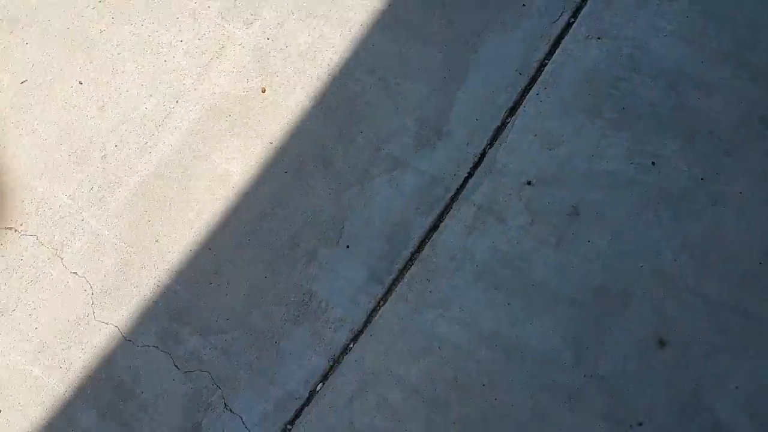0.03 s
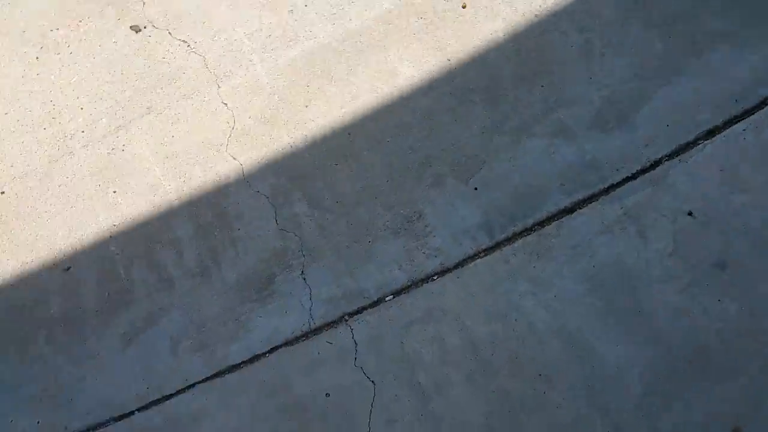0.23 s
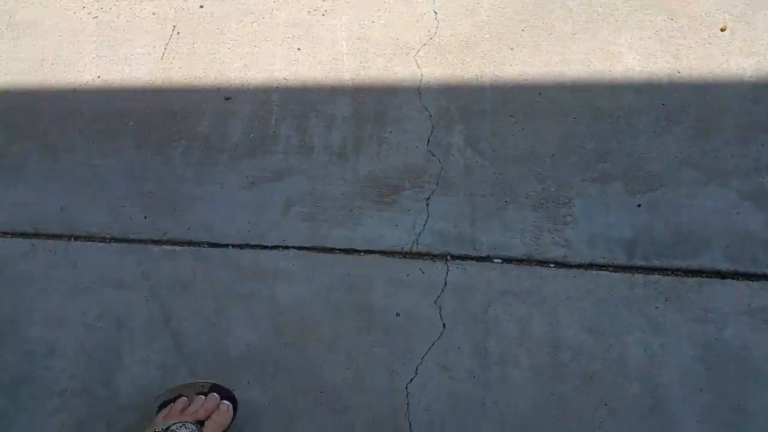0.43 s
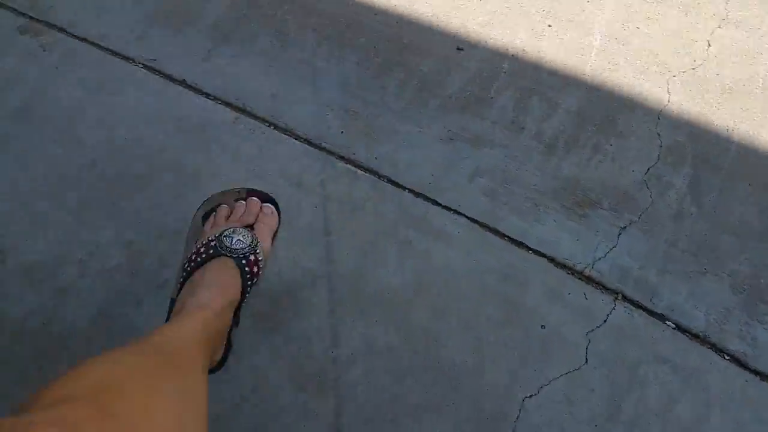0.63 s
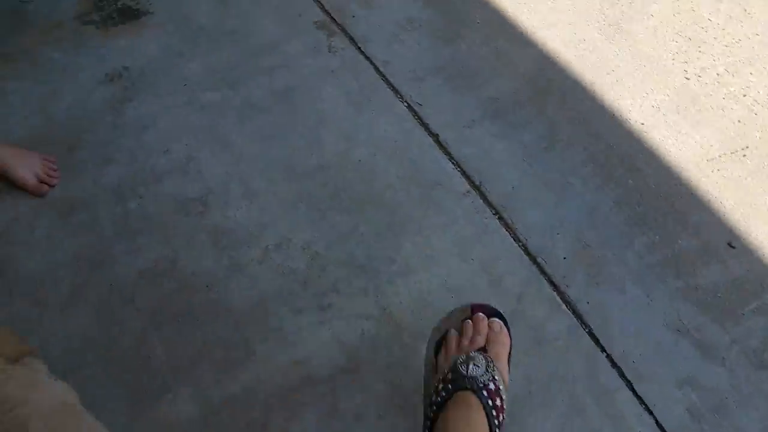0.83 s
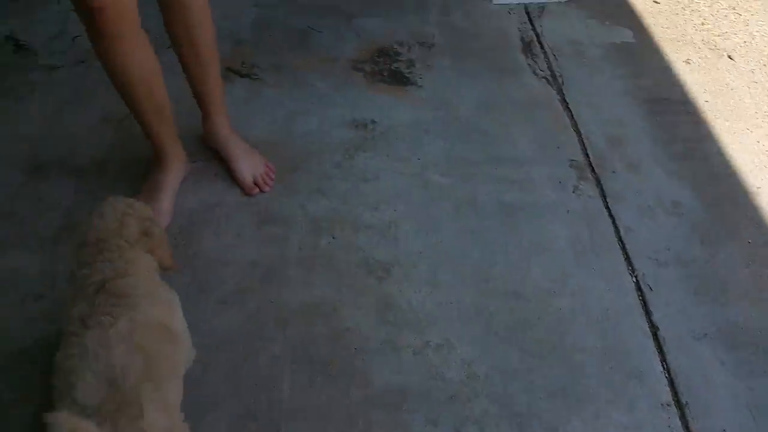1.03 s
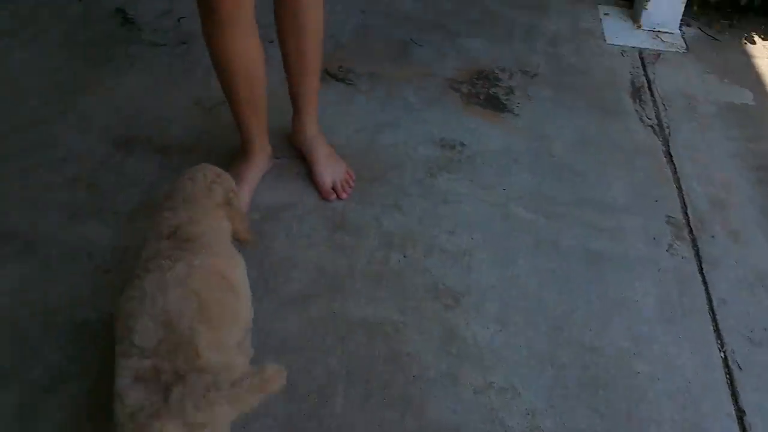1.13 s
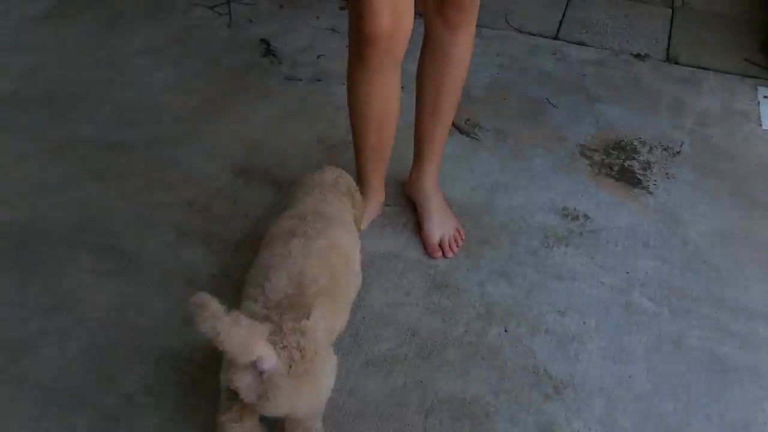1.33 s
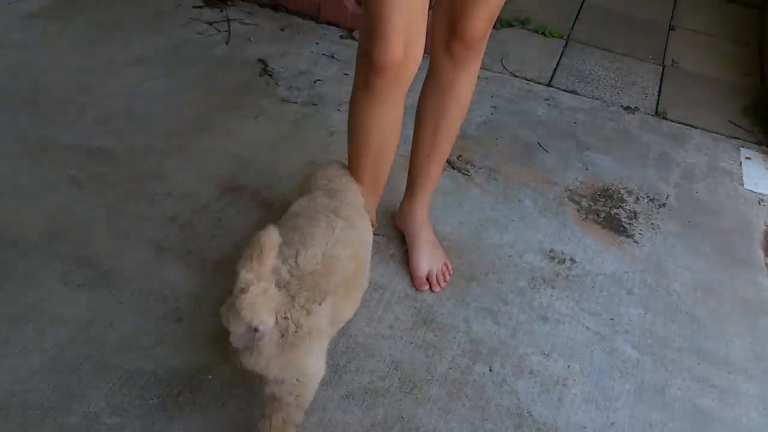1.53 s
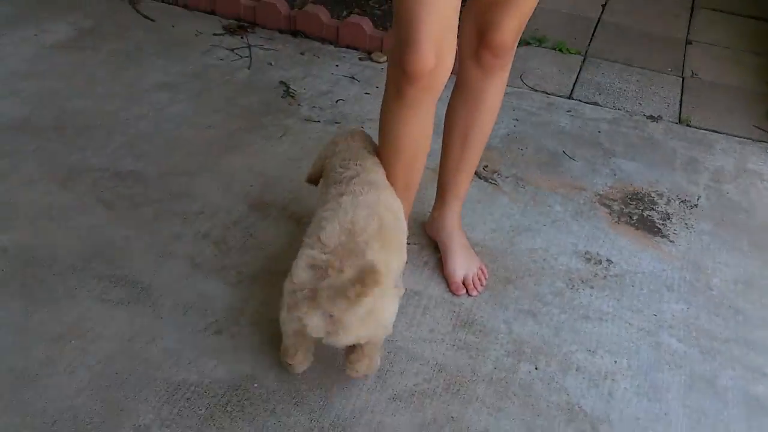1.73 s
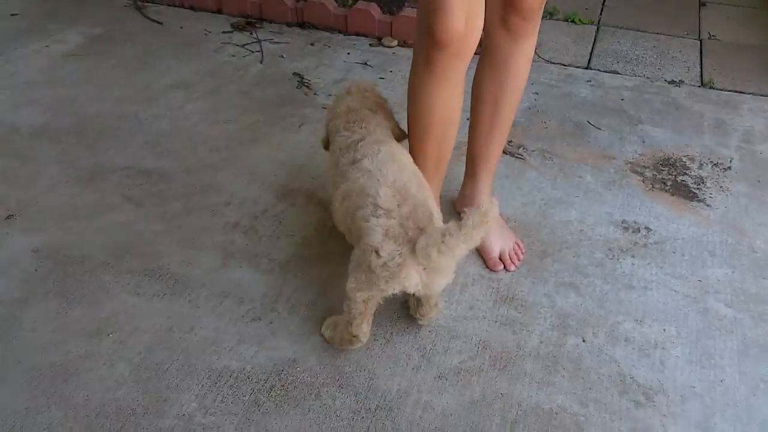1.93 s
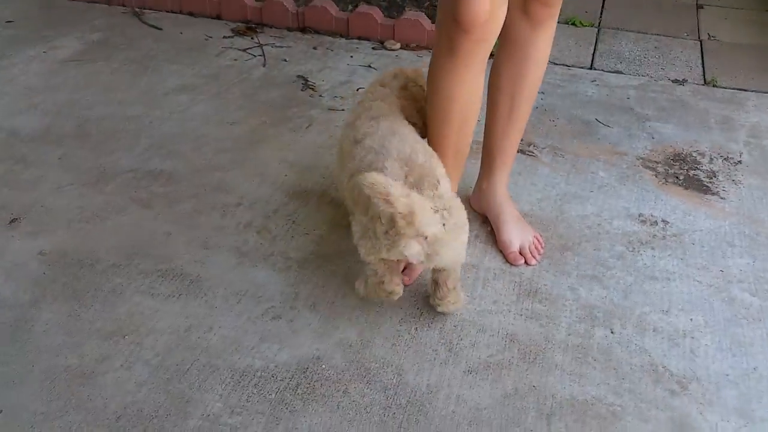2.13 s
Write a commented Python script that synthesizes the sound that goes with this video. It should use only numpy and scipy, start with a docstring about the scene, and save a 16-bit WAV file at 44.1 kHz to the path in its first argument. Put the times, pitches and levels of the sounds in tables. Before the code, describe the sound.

A puppy's claws tick on a concrete patio over low traffic rumble and faint machine drones. Light scuffs and small clicks come in the first half second, while an engine hum fades by 0.8 seconds. A distant dog barks once around 0.9. From 1.1 to 1.4 come sharp close clicks on the right, gritty scuffs and two soft bumps. More claw ticks and scrapes follow from 1.6 to 1.8.

```python
"""A puppy walks about on a concrete patio: its claws tick by impact, and its paws and a sandal
scuff the grit by friction, a dense train of tiny slips. A few sharp dry clicks (impulses with broad
resonances) and two soft bumps come from very near the right microphone. Far off a dog barks once,
its vocal folds and hoarse breath heard by reflection from walls. Under it all lie neighbourhood
rumble, machine drones and an engine hum that fades and faintly returns."""
import sys
import numpy as np
from scipy import signal
from scipy.fft import rfft, irfft, next_fast_len
from scipy.io import wavfile
from scipy.ndimage import uniform_filter1d

SR = 44100
rng = np.random.default_rng(int(sys.argv[2]) if len(sys.argv) > 2 else 0)


def to_wav(s):
    """Save 16-bit WAV."""
    ch = np.atleast_2d(s).T  # columns
    pcm = np.round(np.clip(ch, -1, 1) * 32767)  # PCM
    wavfile.write(sys.argv[1], SR, pcm.astype(np.int16))


N = 96314
PADDED = next_fast_len(N, True)
T, HZ = np.arange(N) / SR, np.fft.rfftfreq(PADDED, 1 / SR)

# Traffic spectra, early and late (frequency [Hz], relative density [dB])
TRAFFIC_EARLY = [(15, -36), (25, -11), (97, -5), (137, -5), (166, -7.5), (285, -9.5), (591, -17.5),
                 (887, -17), (1400, -26), (2110, -21.5), (3430, -32.5), (3820, -34.5), (5730, -37),
                 (7920, -46), (16000, -50.5)]
TRAFFIC_LATE = [(15, -48), (25, -20), (76, -8), (114, -3.5), (141, -9), (293, -14), (384, -23), (427, -17),
                (516, -19), (887, -20), (1840, -24.5), (2000, -26.5), (4250, -35), (5140, -35),
                (16000, -53.5)]
# Course of the traffic (time [s], level [dB], share of the late spectrum [0-1])
TRAFFIC_COURSE = [(0, -43.5, 0.21), (.35, -44.5, 0.036), (.55, -45.5, .1), (.72, -44.5, 0),
                  (1.1, -44.5, 0.23), (1.38, -46.5, 1), (1.53, -49.5, 0.66), (1.9, -50, 0.88),
                  (2.18, -51.5, 0.89)]
# Likeness of its two channels (frequency [Hz], correlation [negatives count as 0])
TRAFFIC_COHERENCE = [(60, 0.78), (150, 0.92), (380, 0.83), (950, 0.24), (2380, -0.25), (5980, -0.51),
                     (15000, -1.3)]
# Its balance (frequency [Hz], left minus right [dB])
TRAFFIC_PAN = [(60, -0.5), (150, -2.5), (380, 1), (950, -1), (2380, 0.5), (5980, -8), (15000, 3.5)]
# Machine drones (frequency [Hz], bandwidth [Hz], level [dB])
MACHINE_DRONES = [(117.7, 4, -60.5), (291.8, 6.7, -64), (1688, 180, -68)]
# Engine hum (time [s], level [dB])
ENGINE_LEVEL = [(0, -46), (.26, -45.5), (.5, -46.5), (.7, -53.5), (.9, -86), (2.18, -55)]
# Strokes of paw or sole (peak time [s], rise [s], fall [s], rasp [dB], grit [dB], left minus right [dB])
SCUFF_STROKES = [(.188, 0.01, .01, -54, -47.5, -10), (0.456, 0.047, 0.029, -59, -50, -7),
                 (.53, 0.017, 0.039, -75, -57, 5), (1.148, 0.047, 0.024, -47.5, -53.5, -10.5),
                 (1.198, 0.0017, 0.019, -36, -45.5, 2), (1.226, 0.014, 0.02, -56, -47.5, -10),
                 (1.268, 0.014, 0.038, -51, -55.5, -13), (1.345, 0.041, 0.15, -52.5, -60, 0),
                 (1.607, 0.0065, 0.015, -55, -73, -11), (1.640, 0.012, 0.0097, -40, -48, -2.5),
                 (1.662, .008, 0.056, -50, -56, -3), (1.778, 0.012, 0.016, -39, -51.5, 4),
                 (1.823, 0.017, 0.024, -47.5, -51, -1.5)]
# Friction spectra (frequency [Hz], relative level [dB])
RASP_SPECTRUM = [(300, -22), (1000, -12), (1800, -8.5), (2450, 0), (3300, -12.5), (4400, -11.5),
                 (5400, -52), (9000, -35), (16000, -34)]
GRIT_SPECTRUM = [(500, -14), (3000, 1.5), (4500, -1), (6000, 2.5), (7400, 0), (8700, -17.5), (12000, -15),
                 (16000, -21.5)]
SKID_SPECTRUM = [(2000, -24), (5000, -2), (8000, 3), (12500, -1), (16000, -5)]
# Close clicks (time [s], thud [dB], knock [dB], knock frequency [Hz], crack [dB], edge [dB],
# left gain [dB], left tilt [dB/octave])
CLOSE_CLICKS = [(0.266, -25, -13, 5300, -18.5, -45, -19, 3), (1.086, -29, -4.5, 2430, -21, -39, -29, -3),
                (1.2047, 1.5, 19, 1340, 16, -0.5, 10.5, 0.5), (1.2781, -6, 4, 1400, 4, -16, -5, 5),
                (1.3280, 12.5, 10, 1240, -10.5, -21.5, -6.5, -7),
                (1.7341, -2, 8.5, 1040, -1, -29, -3.5, -0.5)]
# A click at the left microphone, before gain and tilt (frequency [Hz], level [dB])
LEFT_CLICK_SPECTRUM = [(200, -21), (500, -17.5), (1000, 2.5), (1500, -5.5), (2300, -2), (3000, -3),
                       (4000, -8), (4800, -29), (6000, -21), (8000, -34), (15000, -40)]
# Claw impacts (time [s], ring [dB], ring frequency [Hz], snap [dB], left minus right [dB])
CLAW_IMPACTS = [(0.516, -23, 6500, -14, 23), (1.193, 3, 2620, -15, -5), (1.2748, -8, 2540, -18.5, 9),
                (1.6366, 2.5, 2340, -25, 38), (1.6421, -0.5, 2580, -23, 5), (1.7713, 2.5, 2110, -33, 17),
                (1.7768, 4.5, 2330, -17.5, -2.5), (1.7827, 2.5, 2620, -32, 10),
                (1.7878, -1.5, 1980, -18, 14), (1.8283, -11, 6100, -12, 22)]
# A claw's gritty snap (frequency [Hz], gain [dB])
SNAP_SPECTRUM = [(500, -1), (1300, -3), (2500, 2.5), (4000, -14.5), (6300, 4), (8500, -16), (11000, -24.5),
                 (16000, -12)]
# Vocal tract filters for the voiced and hoarse parts of the bark (frequency [Hz], relative gain [dB])
VOICED_FORMANTS = [(450, -1.5), (900, -1), (1360, -0.5), (1820, -6.5), (2280, -26), (2750, -21),
                   (4000, -45)]
HOARSE_FORMANTS = [(150, -49), (330, -10), (430, -2), (570, 0), (740, -4.5), (880, -2.5), (1080, -0.5),
                   (1330, -2.5), (1550, -15), (1750, -6), (2100, -9), (2500, -16), (3200, -39), (4500, -44),
                   (6300, -29), (9000, -62)]
# Soft bumps (time [s], frequency [Hz], half-width [s], envelope peak [dB], left minus right [dB])
SOFT_BUMPS = [(1.162, 103, 0.0062, -31, -8.5), (1.3305, 165, 0.0067, -34, -21)]


def amp(db):
    """Decibels to amplitude ratio."""
    return 10 ** (np.asarray(db) / 20)


def unit(x):
    """Normalisation to rms 1."""
    return x / np.sqrt(np.mean(x ** 2) + 1e-20)


def read(points, hz=HZ):
    """Interpolation of a spectrum on a log-frequency axis."""
    f, value = np.transpose(points)
    return np.interp(np.log(hz + 1), np.log(f + 1), value)


def pan(db):
    """Constant-power left and right gains for a level difference."""
    return unit(amp([[db / 2], [-db / 2]]))


def colour(x, points):
    """Linear filtering by a spectrum table, at rms 1."""
    return unit(irfft(rfft(x, PADDED) * amp(read(points)), PADDED)[..., :N])


def pulse(gain):
    """Minimum phase: the most compact causal pulse with this spectrum."""
    log_gain = np.log(np.maximum(np.r_[gain, gain[-2:0:-1]], 1e-5))
    return np.fft.ifft(np.exp(np.conj(signal.hilbert(log_gain)))).real


def add(mix, start_s, sound):
    """Superposition of a sound from a given time."""
    part = mix[..., round(start_s * SR):][..., :sound.shape[-1]]
    part += sound[..., :part.shape[-1]]


def traffic():
    """Diffuse noise, coherent only at low frequencies, that dulls as the microphone turns."""
    left, independent = rfft(rng.standard_normal((2, PADDED)))
    coherence = np.clip(read(TRAFFIC_COHERENCE), 0, 1)
    right = coherence * left + np.sqrt(1 - coherence ** 2) * independent
    balance = amp(np.outer([.5, -.5], read(TRAFFIC_PAN)))
    noise = irfft(np.array([left, right]) * balance, PADDED)
    times, db, share = np.transpose(TRAFFIC_COURSE)
    late = np.interp(T, times, share)
    rumble = (1 - late) * colour(noise, TRAFFIC_EARLY) + late * colour(noise, TRAFFIC_LATE)
    return amp(np.interp(T, times, db)) * rumble


def machine_drones():
    """Narrow-band noise: each steady drone is heard as a pitch at its band's centre."""
    out = np.zeros(N)
    for hz, width, db in MACHINE_DRONES:
        band = rfft(rng.standard_normal(PADDED)) / (1 + (2 * (HZ - hz) / width) ** 2)
        out += amp(db) * unit(irfft(band, PADDED)[:N])
    return out


def engine_hum(hz=140, waver=0.016):
    """Frequency modulation: an engine's tone wavers with its speed."""
    drift = unit(uniform_filter1d(rng.standard_normal(N), size=3000))
    cycles = np.cumsum(hz * (1 + waver * drift)) / SR
    return amp(np.interp(T, *np.transpose(ENGINE_LEVEL))) * unit(np.sin(2 * np.pi * cycles))


def friction(spectrum, slips_per_s=4000, spread_db=4.5):
    """Shot noise: tiny slips over sand grains give random impulses of uneven size."""
    size = amp(spread_db * np.minimum(rng.exponential(1, (2, N)), 4))
    slips = size * rng.choice([-1, 1], (2, N)) * (rng.random((2, N)) < slips_per_s / SR)
    return colour(slips, spectrum)


def swell(peak_s, rise_s, fall_s):
    """Exponential growth to a peak and decay from it."""
    return np.exp(-np.minimum(np.maximum((peak_s - T) / rise_s, (T - peak_s) / fall_s), 20))


def scuffs():
    """Sliding friction: paws and a sole drag over concrete with a rasp and a gritty hiss."""
    rasp, grit = friction(RASP_SPECTRUM), friction(GRIT_SPECTRUM)
    return sum(pan(side) * swell(peak_s, rise, fall) * (amp(rasp_db) * rasp + amp(grit_db) * grit)
               for peak_s, rise, fall, rasp_db, grit_db, side in SCUFF_STROKES)


def close_clicks(size=1024, thud_hz=260, thud_width_hz=2230, dispersion=0.55, left_delay_s=.00042):
    """Impulse response: hard contacts excite broad resonances, heard later and duller on the left."""
    out, hz = np.zeros((2, N)), np.fft.rfftfreq(size, 1 / SR)

    def resonance(centre_hz, octaves):
        """A broad peak, symmetric in log frequency."""
        return (1 + (np.log2((hz + 1) / centre_hz) / octaves) ** 2 / 4) ** -4

    thud = hz / np.hypot(hz, thud_hz / 2) / (1 + ((hz - thud_hz) / thud_width_hz) ** 2) ** 2
    crack = resonance(2400, 0.48) + resonance(3826, 0.23)
    edge = resonance(9100, 0.87)
    tilt_octaves = np.log2(np.maximum(hz, 300) / 2000)
    for start_s, thud_db, knock_db, knock_hz, crack_db, edge_db, left_db, tilt in CLOSE_CLICKS:
        knock = resonance(knock_hz, 0.4)
        bands = [amp(thud_db) * thud, amp(knock_db) * knock, amp(crack_db) * crack, amp(edge_db) * edge]
        right = pulse(np.linalg.norm(bands, axis=0))  # the bands add in power
        right = signal.lfilter([-dispersion, 1], [1, -dispersion], right)  # all-pass: treble leads
        left = pulse(amp(left_db + read(LEFT_CLICK_SPECTRUM, hz) + tilt * tilt_octaves))
        add(out[1], start_s, right)
        add(out[0], start_s + left_delay_s, left)
    return out


def claw_ticks(size=1024, ring_t60_s=0.0071, snap_s=0.0015):
    """Damped free vibration: a claw strikes concrete with a gritty snap and rings briefly."""
    out, t, hz = np.zeros((2, N)), T[:size], np.fft.rfftfreq(size, 1 / SR)
    snap_pulse = pulse(amp(read(SNAP_SPECTRUM, hz)))
    envelope = amp(-60 * t / ring_t60_s) * (1 - np.exp(-t / snap_s))
    for start_s, ring_db, ring_hz, snap_db, side in CLAW_IMPACTS:
        crush = rng.standard_normal((2, size)) * np.exp(-t / snap_s)
        crush /= np.linalg.norm(crush, axis=1, keepdims=True)
        snap = signal.fftconvolve(crush, snap_pulse[None])[:, :size]
        ring = np.sin(2 * np.pi * ring_hz * t) * envelope * 2 / envelope.sum()
        add(out, start_s, pan(side) * (amp(ring_db) * ring + amp(snap_db) * snap))
    return out


def bark(start_s=.84, length_s=.16, rise_s=0.024, fall_s=0.031, top_hz=454.7, hoarseness=0.51):
    """Source and filter: the vocal tract shapes fold harmonics and breath pulsed at the same pitch."""
    age = T - start_s
    arch = np.sin(np.pi * np.clip(age / length_s, 0, 1))
    jitter = .6 * uniform_filter1d(rng.standard_normal(N), size=120)
    cycles = np.cumsum(top_hz * (1 - .12 * (1 - arch)) * (1 + jitter)) / SR
    folds = unit(sum(np.cos(2 * np.pi * k * cycles) for k in range(1, 9)))
    puffs = (0.49 + np.exp(-(cycles % 1) / 0.28)) * rng.standard_normal(N)
    closing = (length_s - age) / fall_s
    gate = lambda delay_s: np.clip(np.minimum((age - delay_s) / rise_s, closing), 0, 1)
    hoarse = gate(delay_s=0) * colour(puffs, HOARSE_FORMANTS)
    voiced = gate(delay_s=0.021) * colour(folds, VOICED_FORMANTS)
    return (1 - hoarseness) * voiced + hoarseness * hoarse


def wall_reflections(sound, gain_db=-29.5, t60_s=0.61, echo_s=.2, echo_db=-12.5):
    """Reverberation: a far sound arrives only as early reflections, a decaying tail and a late echo."""
    t = T[:SR]
    reflections = rng.standard_normal((2, SR)) + 0.72 * rng.standard_normal(SR)  # partly coherent
    early = 1.7 * np.exp(-t / 0.0075)
    tail = amp(-60 * t / t60_s)
    echo = amp(echo_db - 60 * abs(t - echo_s) / t60_s) * (t > echo_s)
    response = reflections * (early + tail + echo)
    return amp(gain_db) * signal.fftconvolve(sound[None], response / np.linalg.norm(response[0]))[:, :N]


def soft_bumps():
    """Gaussian wave packets: low pushes of pressure about one cycle long."""
    return sum(pan(side) * amp(db) * np.exp(-((T - s) / width) ** 2) * np.sin(2 * np.pi * hz * (T - s))
               for s, hz, width, db, side in SOFT_BUMPS)


def claw_skid(level_db=-52.5):
    """Sliding friction: a claw slips with a brief, thin hiss."""
    envelope = swell(peak_s=1.8075, rise_s=.01, fall_s=0.0036)
    return pan(7) * amp(level_db) * envelope * friction(SKID_SPECTRUM)


def scene():
    """Superposition: the pressures of all sources add on the patio."""
    events = close_clicks() + claw_ticks() + scuffs() + claw_skid() + soft_bumps()
    return events + wall_reflections(bark()) + traffic() + machine_drones() + engine_hum()


def record(dry, cutoff_hz=16100):
    """Band limiting by a linear-phase low-pass filter."""
    lowpass = signal.firwin(255, cutoff_hz, window=("kaiser", 9), fs=SR)
    return signal.oaconvolve(dry, lowpass[None], "same")


dry = scene()
out = record(dry)
to_wav(out)
```